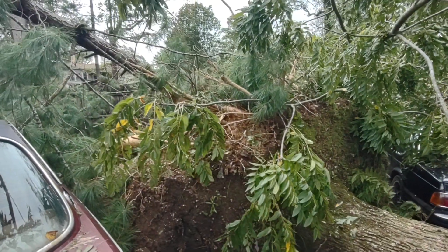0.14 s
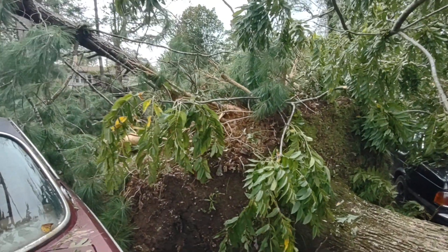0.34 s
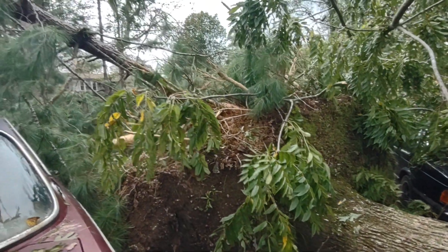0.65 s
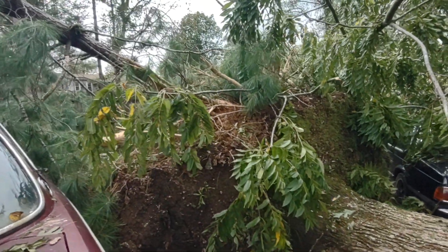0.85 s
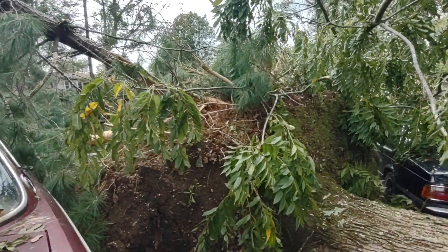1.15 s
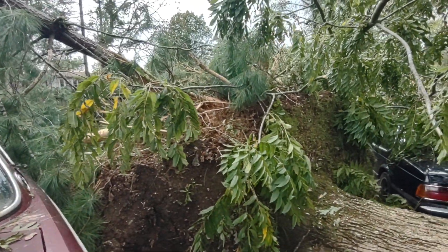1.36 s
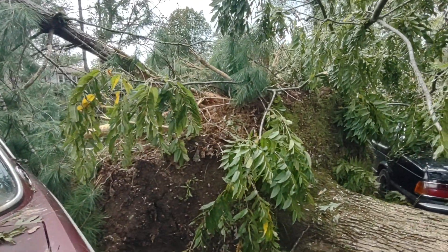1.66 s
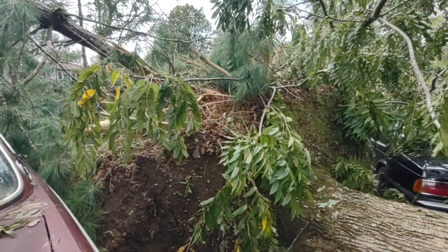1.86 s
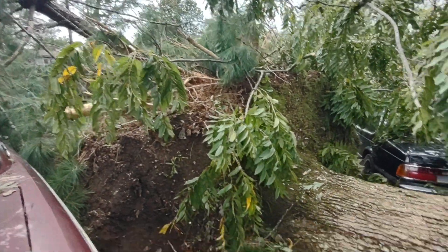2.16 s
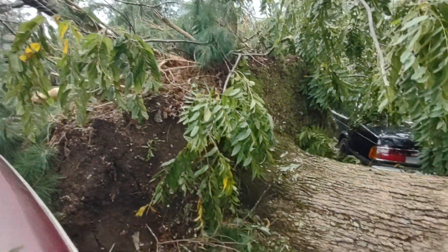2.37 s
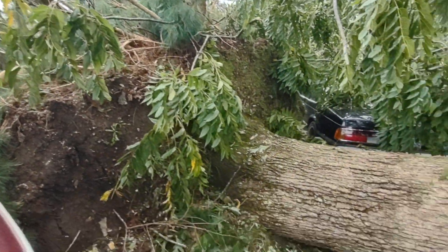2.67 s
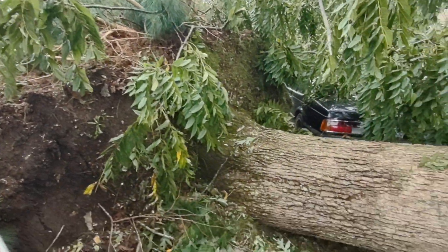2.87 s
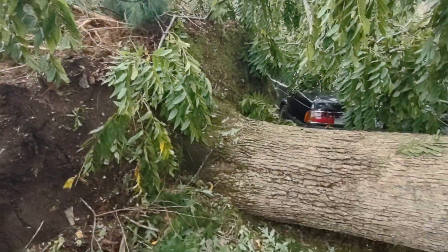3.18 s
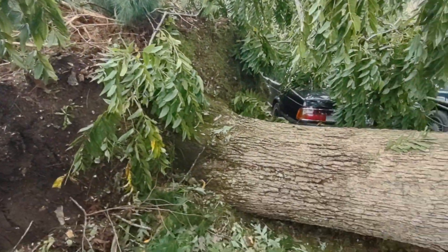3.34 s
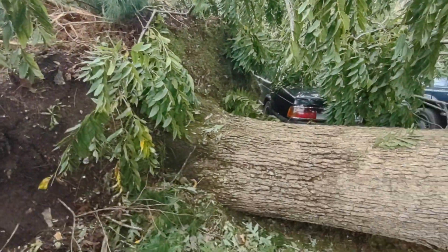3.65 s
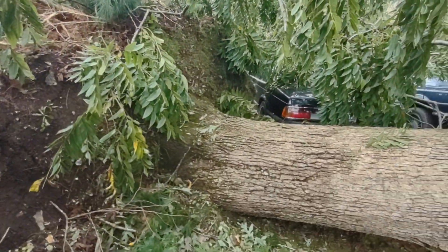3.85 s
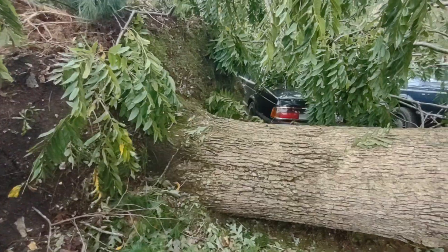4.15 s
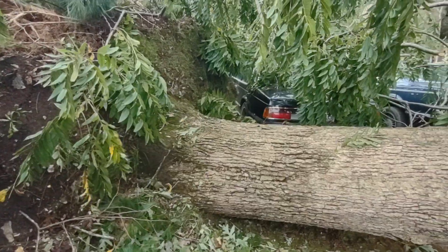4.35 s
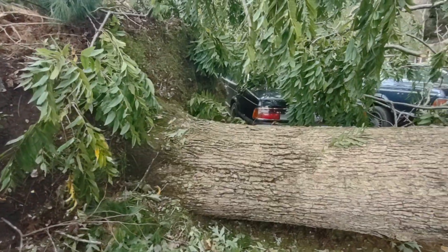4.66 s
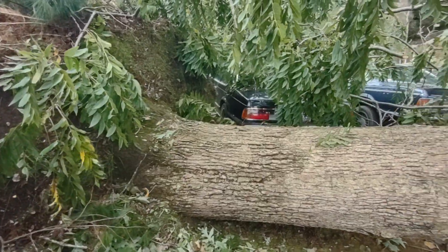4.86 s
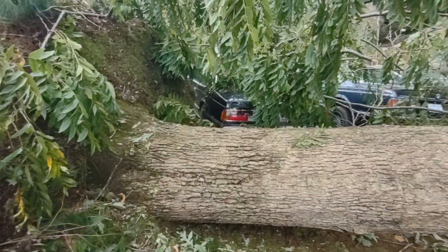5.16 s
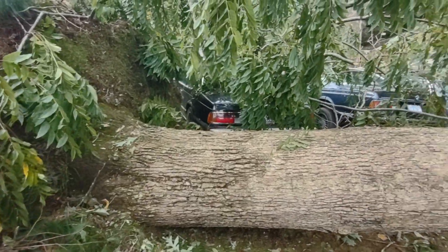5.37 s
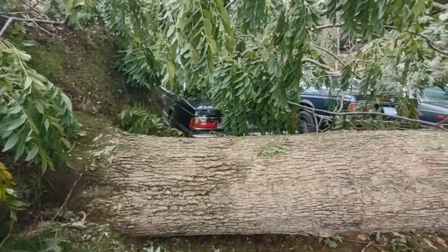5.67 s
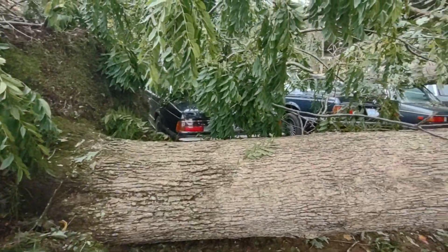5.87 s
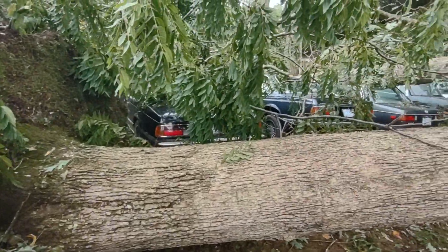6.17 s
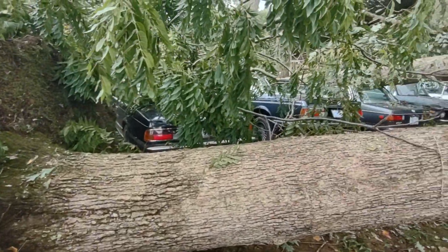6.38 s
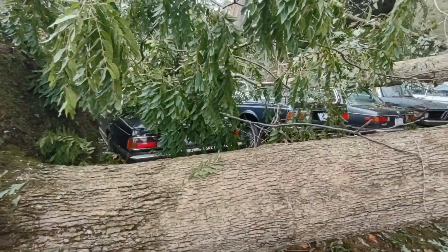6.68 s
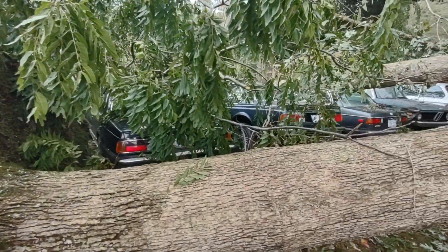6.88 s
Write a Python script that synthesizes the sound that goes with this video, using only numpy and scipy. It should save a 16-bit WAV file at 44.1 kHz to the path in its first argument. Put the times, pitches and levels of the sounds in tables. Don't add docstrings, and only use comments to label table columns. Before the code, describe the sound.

In an open yard with a huge fallen tree, a petrol generator hums low and steadily. Some way off, an electric chain saw whines with a rough, throbbing gear noise. It bites in, sags in pitch with chain links knocking, then recovers and runs free, higher and hissier. A handheld stereo microphone turns slowly, bringing the saw from the right toward the middle.

```python
import sys
import numpy as np
from scipy import signal
from scipy.io import wavfile
from scipy.ndimage import uniform_filter1d

SR = 44100
rng = np.random.default_rng(int(sys.argv[2]) if len(sys.argv) > 2 else 0)


def makeup_ratio(level_db):
    decades = np.asarray(level_db, float) / 20
    return 10 ** decades


def unload_audio(sound):
    columns = np.transpose(np.atleast_2d(sound))
    steps = np.round(np.clip(columns, -1, 1) * 32767)
    wavfile.write(sys.argv[1], SR, steps.astype(np.int16))


N = 309582
T = np.arange(N) / SR
FRAME, HOP = 2048, 512
FRAME_T = np.arange(N // HOP + 2)[:, None] * HOP / SR
SIDES = np.array([[.5], [-.5]])

# (time [s], tooth rate [Hz], effort [dB])
SAW_RUN = [(0, 1446, -6.5), (.6, 1509, -3.5), (.95, 1480, -3), (1.2, 1485, 0), (2.1, 1492, .5),
           (2.7, 1477, 3), (3, 1440, .5), (3.3, 1386, -0.5), (3.8, 1376, 0), (4.1, 1262, -7.5),
           (4.27, 1217, -7.5), (4.55, 1444, 0), (4.75, 1505, 2.5), (5.1, 1542, 3), (5.9, 1542, 2),
           (7.02, 1524, 2.5)]
# (time [s], left lag [ms], gear left-right [dB], hiss left-right [dB])
HAND_TURN = [
    (0, 0.2, -10, -2),
    (1.8, 0.22, -6, -4),
    (2.4, 0.25, -7.5, -4),
    (3, 0.42, -3, -4),
    (4, 0.42, -2.5, -4.5),
    (5, 0.47, -3.5, -7.5),
    (7.02, 0.51, -1.5, -7.5),
]
# (time [s], peak level [dB], ring frequency [Hz])
LINK_KNOCKS = [(0.655, -30, 1950), (1.3603, -29, 2690), (2.3272, -30, 3010), (2.505, -22.5, 2910),
               (2.6306, -27.5, 2890), (2.71, -25.5, 3000), (2.812, -27, 2320), (2.8638, -34, 2350),
               (3.053, -34, 2800), (3.1303, -29, 2320), (3.2154, -29, 2870), (3.3542, -26, 2270),
               (3.459, -27, 2250), (3.648, -26, 2234), (3.7584, -28, 2390), (3.8452, -28, 2340),
               (4.1435, -28, 2480), (4.2313, -31, 2210), (4.3253, -24.5, 2420), (4.5745, -27, 2320),
               (4.7797, -23, 2330), (4.9546, -24, 2310), (5.0564, -33, 2067), (5.1048, -18.5, 2370),
               (5.2026, -23.5, 2240), (5.45, -24, 2260), (5.6256, -28, 2280), (6.1436, -24, 2332),
               (6.2916, -24, 2226), (6.565, -24, 2090)]
# (from [s], to [s])
BITE_S, LEAVE_S, LIFT_S = (2.44, 2.65), (4.55, 5.28), (4.47, 5.75)


def evened(x):
    return x / np.sqrt(np.mean(x ** 2) + 1e-20)


def curve(rows, column, t):
    rows = np.array(rows)
    return np.interp(t, rows[:, 0], rows[:, column])


def ramp(span_s, t):
    return np.clip((t - span_s[0]) / (span_s[1] - span_s[0]), 0, 1)


def wander(rate_hz):
    lowpass = signal.butter(2, rate_hz, fs=SR, output="sos")
    settled = signal.sosfilt(lowpass, rng.standard_normal(N + SR))[SR:]
    return evened(settled)


def peak(hz, centre_hz, width_hz, db):
    return makeup_ratio(2 * db) / (1 + (2 * (hz - centre_hz) / width_hz) ** 2) ** 2


def branches():
    patches, left, right = rng.standard_normal((3, N // HOP + 2, FRAME // 2 + 1))
    patches = evened(uniform_filter1d(uniform_filter1d(patches, 5, 0), 10, 1))
    paths = [evened(uniform_filter1d(uniform_filter1d(p, 40, 0), 2, 1)) for p in (left, right)]
    return 1.2 * patches + 1.5 * np.array(paths)


def heard(colour_db, level_db, pan_db, same, same_hz, modes=(), lines=(), spectrum=None, tilt_db_per_oct=0):
    hz = np.fft.rfftfreq(FRAME, 1 / SR)
    power = 0 * FRAME_T * hz
    lag_ms = curve(HAND_TURN, 1, FRAME_T)
    turned = np.clip((lag_ms - .19) / .3, 0, 1)
    for centre_hz, width_hz, before_db, after_db in modes:
        power = power + peak(hz, centre_hz, width_hz, before_db + turned * (after_db - before_db))
    if spectrum:
        corner_hz, corner_db = np.transpose(spectrum)
        shape_db = np.interp(np.log(hz + 1), np.log(corner_hz), corner_db)
        power = power + makeup_ratio(2 * (shape_db + tilt_db_per_oct * np.log2(hz / 7000 + .01)))
    for multiple, width_hz, db in lines:
        power = power * (0.5 + peak(hz, multiple * curve(SAW_RUN, 1, FRAME_T), width_hz, db))

    a, b, c, d = rng.standard_normal((4,) + power.shape)
    shared, own = a + 1j * b, c + 1j * d
    like = np.clip(same / (1 + hz / same_hz), 0, 1)
    late = np.exp(-2j * np.pi * hz * lag_ms / 1000)
    z = np.array([late * (like * shared + np.sqrt(1 - like ** 2) * own), shared])
    z *= np.sqrt(power / power.sum(1, keepdims=True)) * makeup_ratio(colour_db)
    sound = signal.istft(z.transpose(0, 2, 1), nperseg=FRAME, noverlap=FRAME - HOP)[1][:, :N]
    return evened(sound) * makeup_ratio(level_db + SIDES * pan_db)


def ports(sound, pan_db):
    at = np.arange(N)
    left = np.interp(at - curve(HAND_TURN, 1, T) * SR / 1000, at, sound)
    return np.array([left, sound]) * makeup_ratio(SIDES * pan_db)


def generator():
    # (order [-], level [dB], left-right [dB], end level [dB], end left-right [dB])
    exhaust = [(2, -60.5, -.5, -61, 0), (3, -65.5, 0, -63.5, 4), (4, -46, -0.5, -43.5, -1.5),
               (5, -43.5, -2, -53.5, 9), (6, -50.5, 2, -49, -5), (7, -55, -1, -61, 8),
               (8, -51, 8.5, -51, -2.5), (9, -68, -15, -48, -7), (10, -60.5, -9, -50, -2.5),
               (11, -59, 8, -68.5, .5), (12, -69.5, -2, -66, 1), (15, -70.5, 0, -66, 0)]
    firing_hz = 30.25
    turns = 2 * np.pi * np.cumsum(firing_hz * (1 + .0012 * wander(1.4))) / SR
    out = np.zeros((2, N))
    for order, first_db, first_pan_db, last_db, last_pan_db in exhaust:
        level_db = np.linspace(first_db, last_db, N)
        pan_db = np.linspace(first_pan_db, last_pan_db, N)
        level_db += -6.5 * np.exp(-((order - 8.5) / 0.94) ** 2 - ((T - 4) / 1.67) ** 2)
        lead = -2 * np.pi * order * firing_hz * curve(HAND_TURN, 1, T) / 1000
        phase = order * turns - 1.15 * max(6 - order, 0) ** 2
        high = max(order - 7, 0)
        phase += T / T[-1] * (2.75 * high - .75 * high ** 2 - 1.1 * max(5 - order, 0))
        phase += 0.97 + 3.0 * max(3 - order, 0)
        level_db += .6 + .9 * wander(3.)
        out[0] += makeup_ratio(level_db + pan_db / 2) * np.cos(phase + lead / 2)
        out[1] += makeup_ratio(level_db - pan_db / 2) * np.cos(phase - lead / 2)
    return np.sqrt(2) * out


def yard(colour_db):
    # (frequency [Hz], level [dB per Hz])
    wash = [(20, -26), (40, -37), (65, -2.5), (100, 3.5), (160, -2.5), (260, -5), (350, -4.5), (450, -6.5),
            (600, -6), (1000, -9.5), (3000, -32)]
    swell_db = np.linspace(-.5, 1, N)
    return heard(.6 * colour_db, -49.5 + swell_db, -1.2, .97, 2500, spectrum=wash)


def saw(colour_db):
    blows = shaft_blows()
    beat, rattle = throb(blows), wander(27.0)
    body = casing(colour_db, beat) + gears(colour_db, beat, rattle) + upper_gears(colour_db, beat, rattle)
    return body + whine(beat) + chain_hiss(colour_db, beat, rattle) + chain_knocks(blows)


def part_db(db, effort_share, lifted_db):
    return db + effort_share * curve(SAW_RUN, 2, T) + lifted_db * ramp(LIFT_S, T)


def shaft_blows():
    blows = 2 * np.cumsum(curve(SAW_RUN, 1, T)) / SR / 38
    s = np.array(LINK_KNOCKS)[:, 0]
    at = np.interp(s, T, blows)
    return blows + np.interp(T, s, 2 * np.round(at / 2) - at)


def throb(blows):
    start, cut, free = 0.06, 0.25, 0.37
    depth = start + (cut - start) * ramp((0, 1.9), T) + (free - cut) * ramp(LEAVE_S, T)
    u = blows % 1 / .22
    beat = u * np.exp(1 - u) * np.where(blows % 2 < 1, 1, .55)
    return depth * evened(beat - beat.mean())


def casing(colour_db, beat):
    # (frequency [Hz], width [Hz], level before the turn [dB], level after [dB])
    casing_modes = [(670, 60, -10, -3), (740, 60, 0, 0), (830, 60, 0, 0), (945, 60, -1, 0),
                    (1035, 60, -1, 0), (1180, 150, -3, -2)]
    pan_db = 0.39 * curve(HAND_TURN, 2, T)
    noise = heard(colour_db, part_db(-42.5, 0.12, -10), pan_db, 0.7, 4500, casing_modes)
    return noise * evened(1 + 0.03 * beat)


def gears(colour_db, beat, rattle):
    # (frequency [Hz], width [Hz], level before the turn [dB], level after [dB])
    gear_modes = [(1339, 78, 0.5, -0.5), (1577, 430, -0.5, 2), (1978, 275, 5.5, -0.5), (2134, 76, 4.5, 3),
                  (2305, 160, -0.5, 4.5), (2546, 430, 0, -3.5)]
    # (multiple of the tooth rate [-], width [Hz], level [dB])
    gear_lines = [(1, 130, 3), (2, 84, 3.5)]
    pan_db = curve(HAND_TURN, 2, T)
    noise = heard(colour_db, part_db(-35.5, 0.21, -0.4), pan_db, .85, 9000, gear_modes, gear_lines)
    return noise * evened((1 + .5 * beat) * makeup_ratio(.4 * rattle)) * shaken()


def upper_gears(colour_db, beat, rattle):
    # (frequency [Hz], width [Hz], level before the turn [dB], level after [dB])
    upper_modes = [(2940, 500, 9, 6), (3545, 980, 3.5, 1.5), (3824, 630, 2, -1.1), (4340, 350, 2.5, -4.5)]
    # (multiple of the tooth rate [-], width [Hz], level [dB])
    upper_lines = [(2.5, 53, 1), (3, 41, 4.3)]
    noise = heard(colour_db, part_db(-42, 0.91, 0), -1, .85, 9000, upper_modes, upper_lines)
    return noise * evened((1 + 0.34 * beat) * makeup_ratio(0.57 * rattle))


def whine(beat):
    # (multiple of the tooth rate [-], pitch flutter [Hz], level flutter [dB], beat share [-], pan share [-])
    tooth_tones = [(1, 9, 2.5, 1.2, .7), (1.5, 45, 2.2, 1.6, .7), (2, 45, 2.5, 1.4, 1.2), (3, 80, 2, .6, 0),
                   (5, 18, 3.5, .3, 1.8)]
    # (skimming [dB], cutting [dB], free [dB], share of the effort [-])
    stages = [(-45, -41, -43, 0.2), (-63, -72, -56, 4), (-50, -61, -46, -0.4), (-53, -61, -58, 4.5),
              (-70, -74, -57.5, -0.5)]
    out = np.zeros((2, N))
    for tone, stage in zip(tooth_tones, stages):
        multiple, flutter_hz, flutter_db, beat_share, pan_share = tone
        skim_db, cut_db, free_db, effort = stage
        hz = multiple * curve(SAW_RUN, 1, T) + flutter_hz * wander(15 + 3 * flutter_hz)
        stage_db = skim_db + (cut_db - skim_db) * ramp(BITE_S, T) + (free_db - cut_db) * ramp(LEAVE_S, T)
        level = makeup_ratio(stage_db + effort * curve(SAW_RUN, 2, T) + flutter_db * wander(17.6))
        struck = np.maximum(1 + beat_share * beat, 0)
        sound = level * np.cos(2 * np.pi * np.cumsum(hz) / SR) * struck
        out += ports(sound, pan_share * curve(HAND_TURN, 2, T))
    return out


def chain_hiss(colour_db, beat, rattle):
    # (frequency [Hz], level [dB per Hz])
    hiss = [(3000, -17), (4800, 2), (5400, -2), (6600, -0.5), (8500, -4.5), (10300, -11), (11600, -19.5),
            (13000, -15), (15700, -16.5), (15900, -60)]
    # (multiple of the tooth rate [-], width [Hz], level [dB])
    hiss_lines = [(5, 77, 4.7), (6, 36, 3)]
    level_db = part_db(-52.5, 0.36, .5) + spray_db(T)
    tilt = -2 + 2.54 * spray_db(FRAME_T)
    noise = heard(1.4 * colour_db, level_db, curve(HAND_TURN, 3, T), .4, 30000,
                  lines=hiss_lines, spectrum=hiss, tilt_db_per_oct=tilt)
    return noise * evened((1 + 0.095 * beat) * makeup_ratio(0.5 * rattle))


def chain_knocks(blows):
    hits = LINK_KNOCKS + light_knocks(blows)
    pings = [(s, db - 6.5, 2 * curve(SAW_RUN, 1, s)) for s, db, _ in hits]
    return knocks(hits, 0.0026) + knocks(pings, 0.0042)


def light_knocks(blows):
    s = np.interp(np.arange(2, blows[-1], 2), blows, T)
    luck, size, pitch = rng.random((len(s), 3)).T
    keep = luck < .33 * (.4 + .6 * ramp(BITE_S, s) + 1.4 * ramp(LEAVE_S, s))
    return list(zip(s[keep], -34.5 + 4 * size[keep], 2280 * (.9 + .14 * pitch[keep])))


def knocks(rows, rise_s):
    out, t = np.zeros(N + 2000), np.arange(1600) / SR
    puff = t / rise_s * np.exp(1 - t / rise_s)
    for (s, db, hz), chance in zip(rows, rng.uniform(-1, 1, (400, 2, 3, 1))):
        ring_hz = hz * (1 + .035 * chance[0])
        rings = np.sin(2 * np.pi * (ring_hz * t + chance[1])).sum(0) / np.sqrt(3)
        out[round(s * SR):][:len(t)] += makeup_ratio(db - 5) * rings * puff
    return ports(out[:N], 1.9 * curve(HAND_TURN, 2, T))


def shaken():
    s, db, _ = np.transpose(LINK_KNOCKS)
    train, u = np.zeros(N), T[:3000] / 0.0043
    train[np.round(s * SR).astype(int)] = makeup_ratio(db + 21.5)
    return 1 + 0.28 * signal.oaconvolve(train, u * np.exp(1 - u))[:N]


def spray_db(t):
    # (start [s], length [s], added hiss [dB])
    dust_spurts = [
        (5.057, 0.56, 1.7),
        (5.652, 0.41, 1.5),
        (6.04, .55, 2),
        (6.848, .4, 1),
    ]
    edge_s = 0.11
    extra_db = 1.24 * ramp(LIFT_S, t)
    for s, length, db in dust_spurts:
        end = s + length
        extra_db = extra_db + db * ramp((s, s + edge_s), t) * (1 - ramp((end - edge_s, end), t))
    return extra_db


def scene():
    colour_db = branches()
    return generator() + yard(colour_db) + saw(colour_db)


def roll_off(x):
    return signal.sosfilt(signal.butter(12, 15790, fs=SR, output="sos"), x)


def record(dry):
    return roll_off(dry)


dry = scene()
out = record(dry)
unload_audio(out)
```